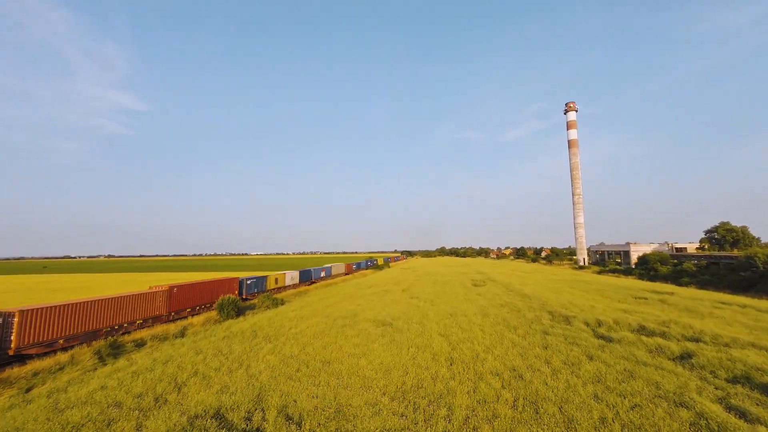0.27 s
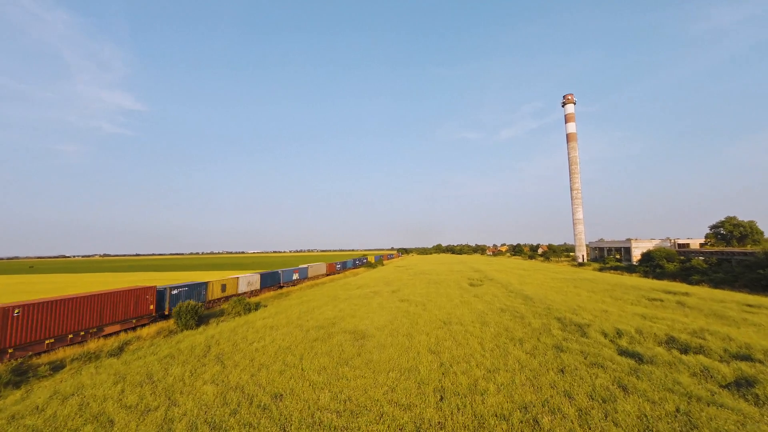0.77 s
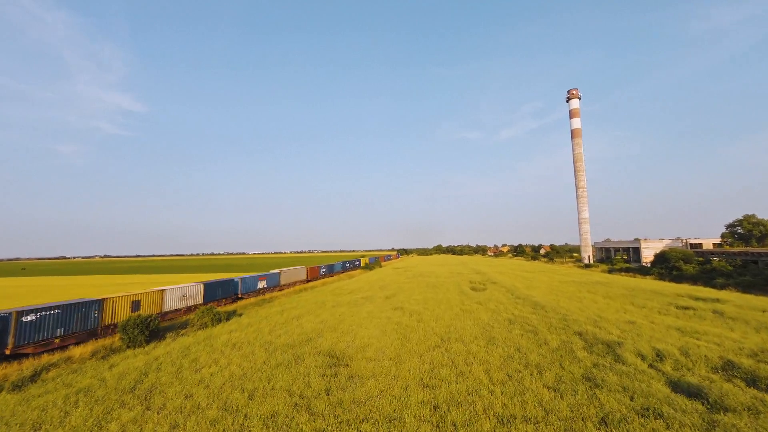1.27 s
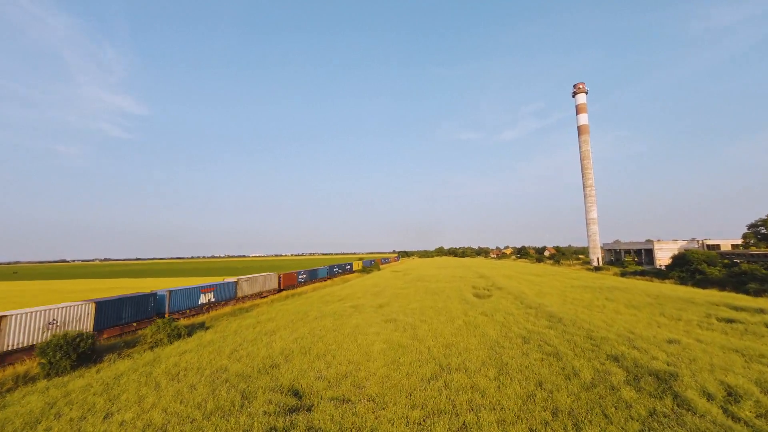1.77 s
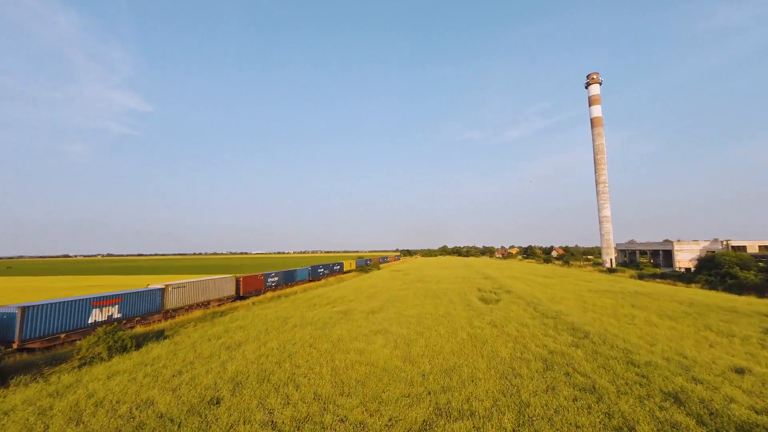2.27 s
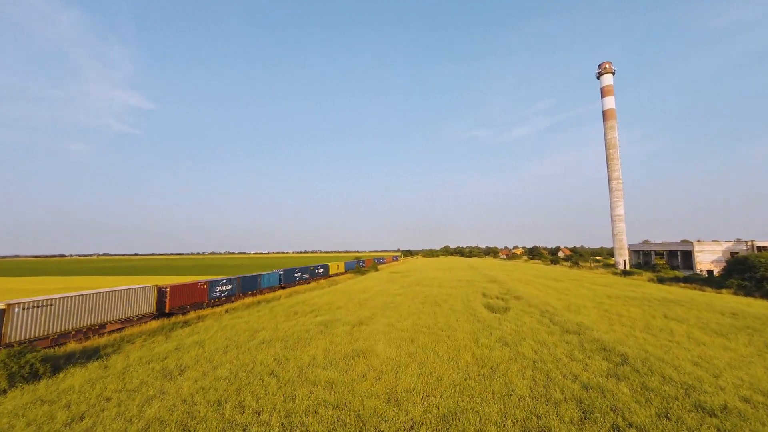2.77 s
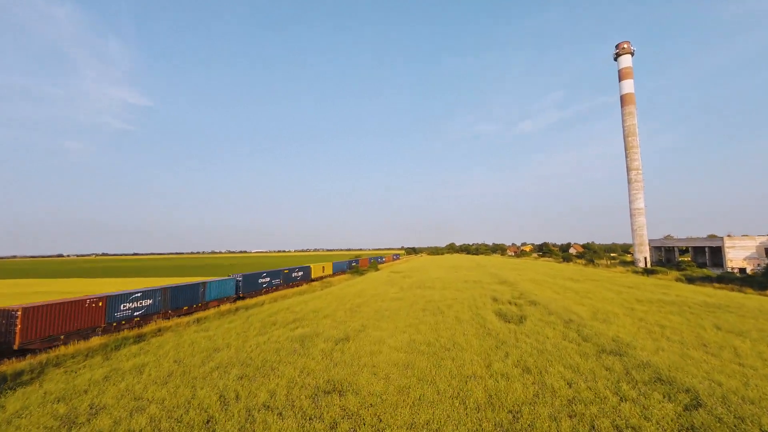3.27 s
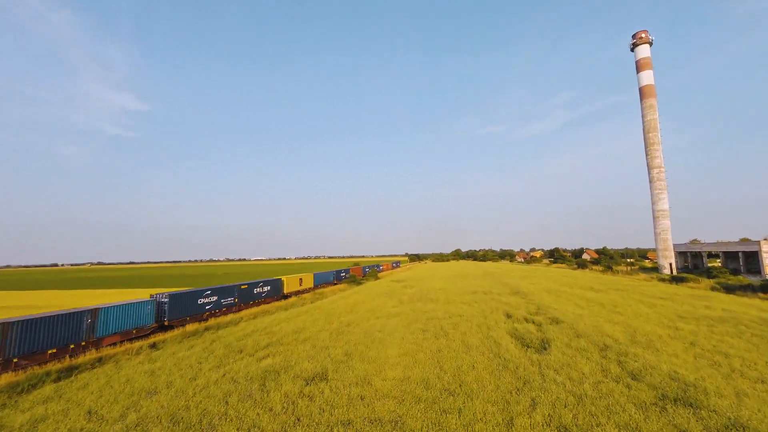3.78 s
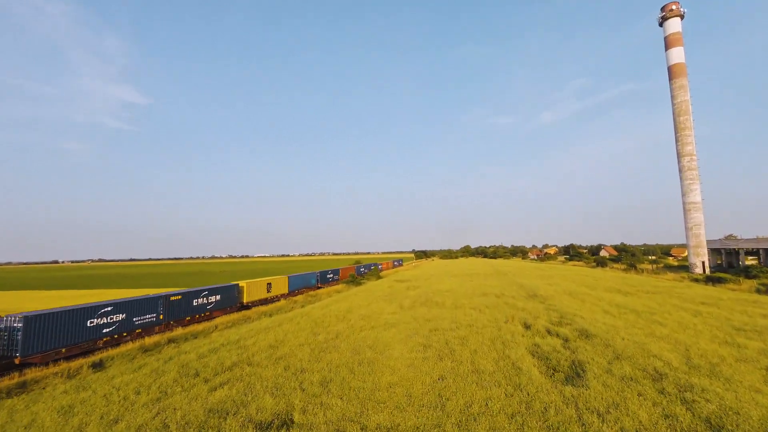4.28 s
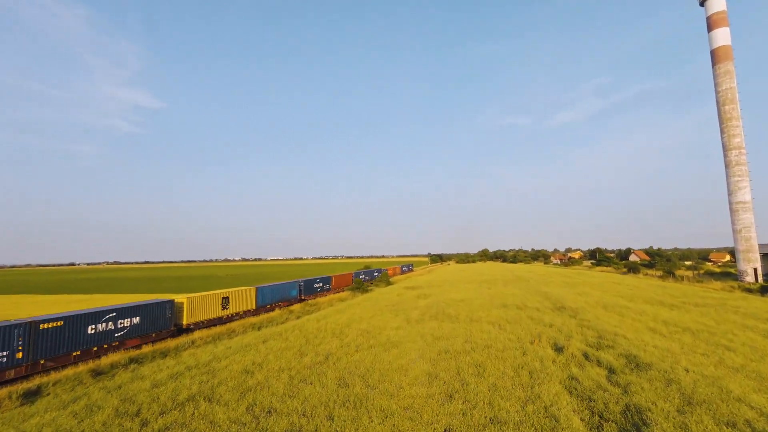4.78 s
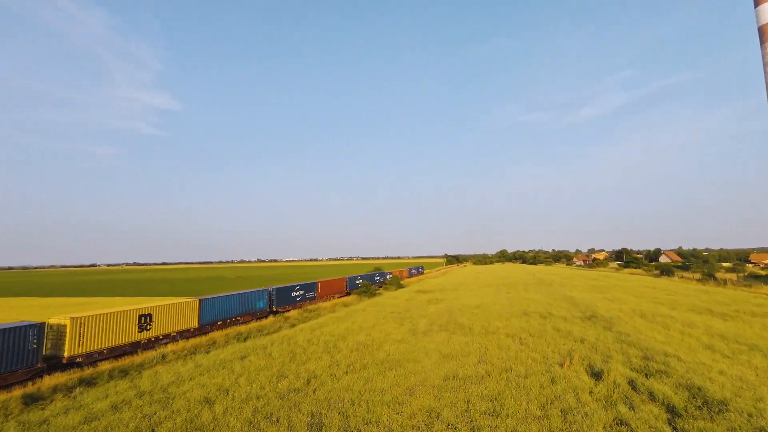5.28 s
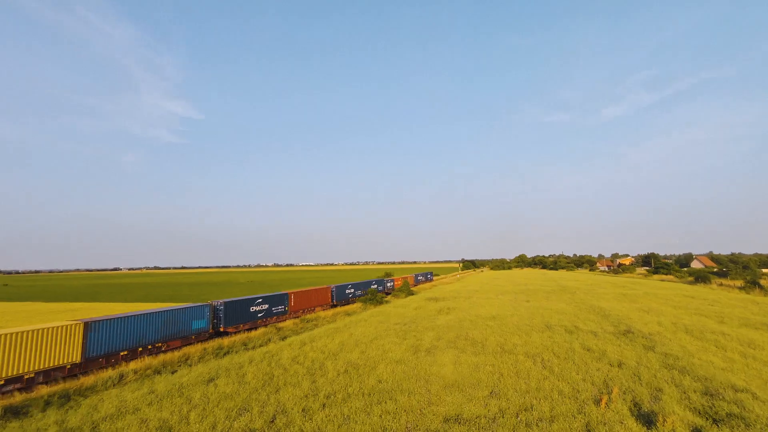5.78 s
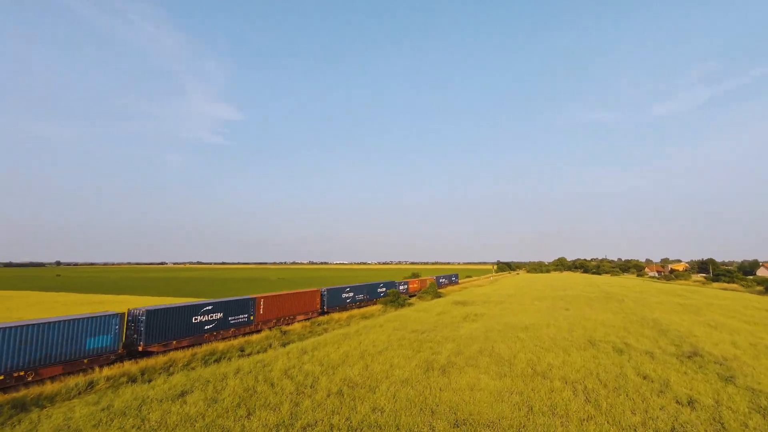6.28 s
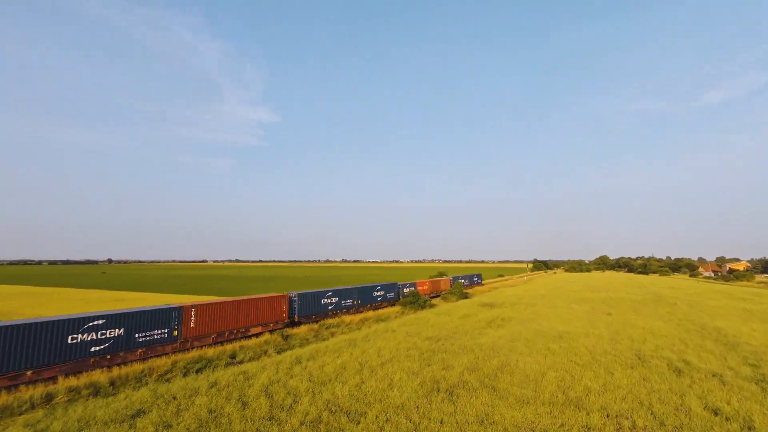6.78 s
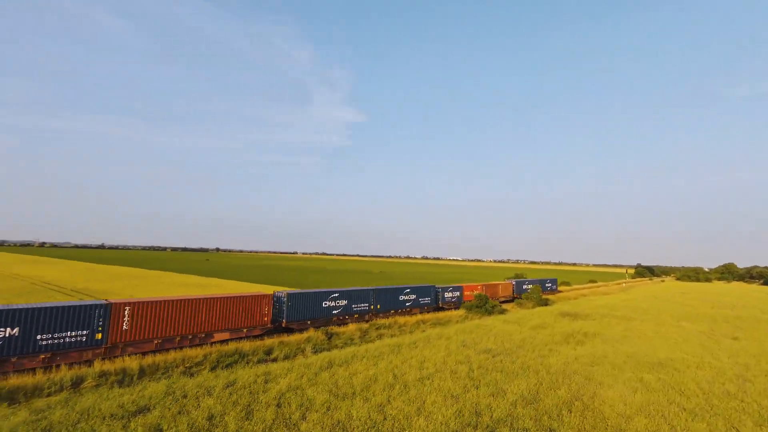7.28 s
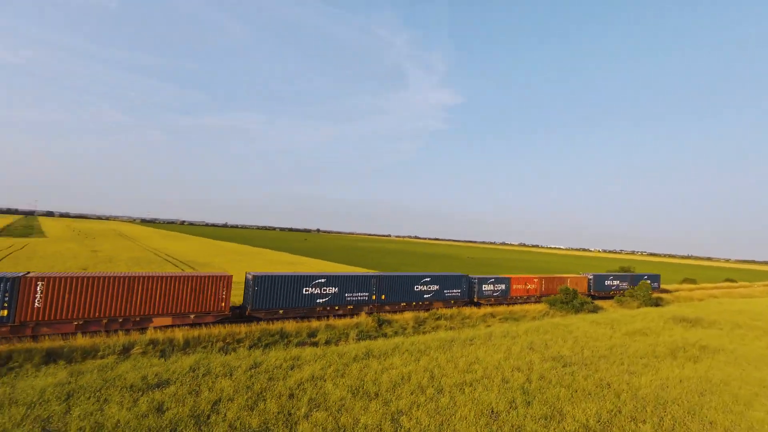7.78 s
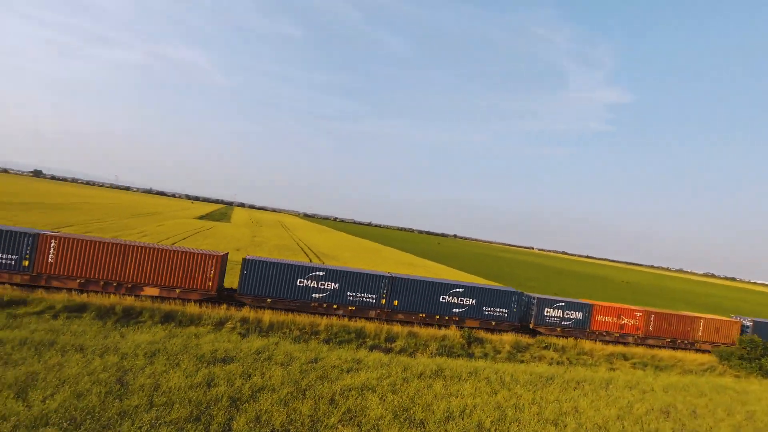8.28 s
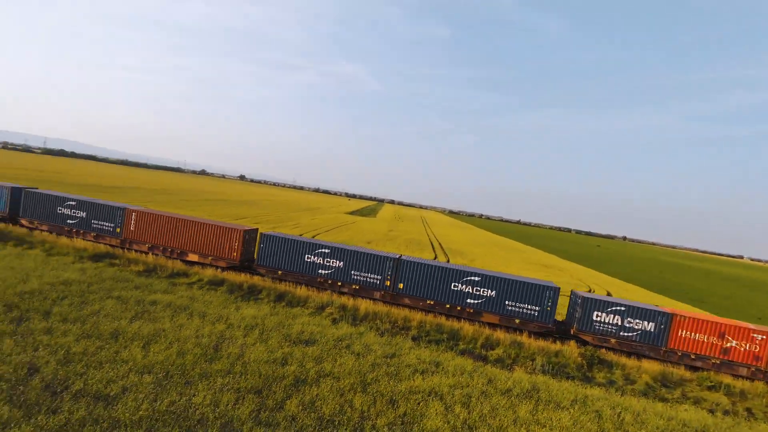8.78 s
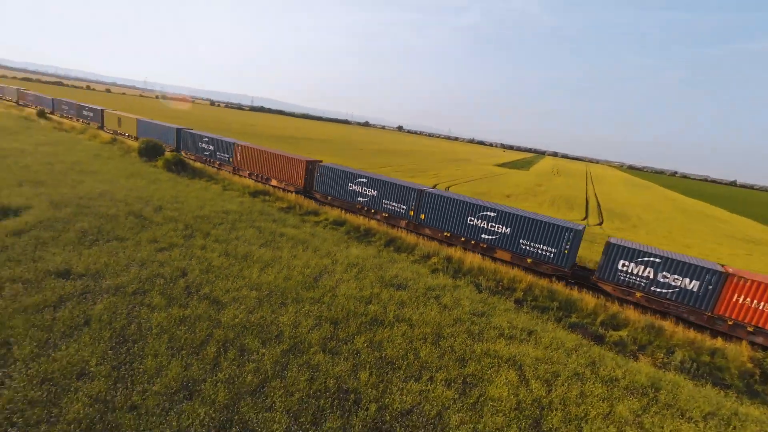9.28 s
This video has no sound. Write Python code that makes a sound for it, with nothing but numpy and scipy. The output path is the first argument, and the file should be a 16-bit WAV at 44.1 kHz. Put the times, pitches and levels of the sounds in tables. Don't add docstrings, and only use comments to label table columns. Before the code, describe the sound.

Continuous loud drone flight over open fields, heard right on the frame: overloaded bassy motor hum with a quick uneven flutter, nasal propeller whine, rattling rumble and breathy blade noise. Small jolts and rough patches break the steadiness. After eight seconds the beat slows and smooths, then the turn brings a stronger whine, a thin high motor tone and a windy gust. Dry, mono, compressed.

```python
import sys
import numpy as np
from scipy import signal
from scipy.fft import rfft, irfft, next_fast_len
from scipy.io import wavfile

SR = 44100
rng = np.random.default_rng(int(sys.argv[2]) if len(sys.argv) > 2 else 0)


def transcribe(signal):
    frames = np.atleast_2d(signal).T
    limited = np.clip(frames, -1, 1)
    pcm = np.round(limited * 32767).astype(np.int16)
    wavfile.write(sys.argv[1], SR, pcm)


def invert_db(x):
    u = np.asarray(x, float) / 20
    return 10 ** u


N = 420273

# time in seconds, level in dB.
WIND_GUSTS = [(0, -28.5), (1.9, -31), (2.4, -33), (3.1, -31), (3.4, -30.5), (4.3, -30.5), (5.5, -32),
              (6, -32), (7, -35.5), (8.3, -33), (8.8, -23.5), (9.53, -26.5)]
# frequency in Hz, level in dB per Hz.
WIND_COLOUR = [(8.8, -40), (15, -12.5), (43, -4.5), (108, -8.5), (125, -5.5), (160, -33.5), (280, -120)]
# frequency in Hz, level in dB per Hz.
RUMBLE_COLOUR = [(100, -32.5), (128, -20), (145, -2), (175, 0), (200, 8.5), (235, -7.5), (275, -26.5),
                 (340, -17), (420, -9.5), (490, -18.5), (600, -10), (690, -18.5), (800, -44)]
# time in seconds, length in seconds, change of the rumble in dB.
SHUDDERS = [
    (1.67, 0.028, -3.5),
    (3.05, .2, 2),
    (4.14, 0.033, 4),
    (4.6, .06, 4.5),
    (7.8, 0.097, 4.5),
    (8.04, 0.032, 4.5),
]
# frequency in Hz, level in dB per Hz.
WASH_COLOUR = [(410, -30), (690, 2.5), (712, -6), (790, -0.5), (1030, -6.5), (1090, -4), (1220, -0.5),
               (1320, -5.5), (1490, -7), (1830, -2.5), (1900, -3), (2010, -10.5), (2400, -38.5),
               (3120, -51), (5280, -120)]
# time in seconds, length in seconds,
# change of the wash in dB.
AIR_BUMPS = [
    (1.85, .07, 4),
    (3.1, 0.3, 1.5),
    (3.506, 0.077, -0.5),
    (6.61, 0.26, 5.5),
    (8.2, 0.036, -16),
    (8.68, 0.039, 3),
]
# frequency in Hz, level in dB per Hz.
CRUISE_HISS_COLOUR = [(1290, -29.5), (2200, -6.5), (2340, -11.5), (2540, -5.5), (3000, -3.5), (3260, 0),
                      (3850, -3.5), (4290, -12), (4690, -9.5), (5940, -4), (6660, -11), (7230, -10),
                      (8050, -18), (9470, -18.5), (11100, -30), (14400, -57.5), (22000, -120)]
# frequency in Hz, level in dB per Hz.
TURN_HISS_COLOUR = [(1180, -35.5), (2000, -10), (2120, -14), (2410, -7.5), (2590, -6.5), (2800, -8),
                    (3180, -6), (3650, -13.5), (4820, -21.5), (5220, -12), (6240, -12.5), (8550, -18),
                    (11100, -35.5), (14400, -60), (22000, -120)]
# time in seconds, share of the turn from 0 to 1.
TURN = [
    (0, 0.06),
    (8.2, 0.07),
    (8.45, 0.5),
    (8.7, 0.8),
    (9.53, 0.87),
]
# frequency in Hz, width in Hz, strength in dB.
FRAME_RESONANCES = [(642.7, 19.6, 5.5), (1112, 20, 11.5), (1224, 49, 0.5), (1850, 32, 4.5)]
# time in seconds, turns a second (Hz) of rotors one, two, three and four.
SHAFT_SPEEDS = [(0.0, 219.3, 205.7, 187.0, 200.2), (0.6, 218.38, 204.62, 186.3, 199.7),
                (1.3, 216.52, 204.38, 189.4, 199.3), (2.0, 217.04, 202.76, 187.6, 198.4),
                (2.7, 217.12, 203.18, 188.6, 198.3), (2.9, 224.33, 209.47, 195.0, 204.4),
                (3.7, 222.47, 208.83, 193.3, 203.5), (4.1, 216.62, 203.38, 191.0, 198.9),
                (5.75, 217.09, 205.41, 189.8, 200.6), (6.2, 219.59, 204.11, 185.8, 199.4),
                (6.8, 222.47, 211.33, 181.2, 206.5), (7.4, 218.56, 208.24, 183.0, 212.8),
                (7.9, 216.4, 211.6, 181.4, 212.0), (8.25, 212.03, 210.37, 187.8, 210.3),
                (8.87, 212.16, 208.64, 196.0, 209.2), (9.08, 214.2, 211.3, 193.8, 212.5),
                (9.25, 221.69, 201.81, 197.5, 211.8), (9.53, 215.27, 204.23, 199.0, 213.0)]
START_ANGLES = [1.72, 6.78, 0, 0]
# time in seconds, load in dB on rotors one, two, three and four.
BLADE_LOAD = [(0, 2.5, 1.5, 1, 4.5), (1, -2.5, 4.5, -1.5, 2), (2.3, -1.5, 7, 2, -0.5), (3.5, 5, 0, -5, 0),
              (4.25, -2, 8, -3, 1), (5.7, -1.5, 2, 0.5, 1), (6.75, 3, 5.5, -4, 1), (7.25, 1, 4, 0.5, 5.5),
              (7.75, 4.5, 7.5, 3, 2), (8.35, 6, -6, 1.5, 6), (8.8, 6.5, 3.5, 3.5, 11),
              (9.2, 6, 9.5, 2.5, 0), (9.53, 6.5, -1.5, 1.5, 2)]
# rotor number from 0, multiple of its shaft speed, level in dB.
ROTOR_TONES = [(0, 1, -7), (0, 2, -31), (0, 3, -30.5), (0, 4, -47), (0, 5, -49.5), (0, 6, -45), (0, 7, -52),
               (0, 15, -54.5), (1, 1, -7), (1, 2, -34), (1, 3, -36), (1, 6, -52), (1, 7, -55),
               (1, 9, -49.5), (1, 12, -61), (2, 1, -24.5), (2, 2, -35), (2, 3, -19), (2, 6, -51),
               (2, 9, -46.5), (2, 10, -52.5), (3, 3, -41.5), (3, 6, -40.5), (3, 15, -56)]


def curves(rows):
    seconds, *columns = np.transpose(rows)
    return [np.interp(np.arange(N) / SR, seconds, column) for column in columns]


def swells(rows):
    time = np.arange(N) / SR
    return sum(db * np.exp(-((time - middle) / length) ** 2) for middle, length, db in rows)


def drift(rate):
    r = np.exp(-80 * np.pi * rate / SR)
    slow = signal.lfilter([1], [1, -2 * r, r * r], rng.standard_normal(N // 40 + 2002))
    slow = slow[2000:]
    return np.interp(np.arange(N) / 40, np.arange(len(slow)), slow / slow.std())


def turbulence(colour, patchy_db, rate, count):
    size = next_fast_len(N)
    octave = np.log2(np.maximum(np.arange(size // 2 + 1) * SR / size, 1))
    hz, db = np.transpose(colour)
    colour_db = np.interp(octave, np.log2(hz), db, -90, -90)
    shaped = rfft(rng.standard_normal(size)) * invert_db(colour_db)
    centres = np.linspace(np.log2(hz[0]), np.log2(hz[-1]), count)
    out = np.zeros(N)
    for share in np.eye(count):
        band = irfft(shaped * np.interp(octave, centres, share), size)[:N]
        out += invert_db(patchy_db * drift(rate)) * band
    return out / out.std()


def wind():
    level_db = curves(WIND_GUSTS)[0] + 3.5 + 2 * drift(4.0)
    return invert_db(level_db) * turbulence(WIND_COLOUR, patchy_db=0.0, rate=3.5, count=2)


def frame_rumble(turn):
    level_db = -12.5 - 0.5 * turn + swells(SHUDDERS) + 1.5 * drift(7.6)
    return invert_db(level_db) * turbulence(RUMBLE_COLOUR, patchy_db=-0.5, rate=5.4, count=4)


def blade_wash(bump_db, flicker):
    level_db = -27.5 + bump_db + 0.6 * flicker
    return invert_db(level_db) * turbulence(WASH_COLOUR, patchy_db=0.46, rate=6.0, count=4)


def tip_hiss(turn, bump_db, flicker, angles):
    level_db = -34 + 3.5 * turn + 0.17 * bump_db + 0.05 * flicker
    passes = 1 + 0.03 * sum(np.cos(3 * angle) for angle in angles)
    cruise = np.sqrt(1 - turn) * turbulence(CRUISE_HISS_COLOUR, patchy_db=-1.17, rate=4.7, count=4)
    banked = np.sqrt(turn) * turbulence(TURN_HISS_COLOUR, patchy_db=-1.0, rate=8.9, count=2)
    return invert_db(level_db) * passes * (cruise + banked)


def air(angles):
    turn = np.clip(curves(TURN)[0], 0, 1)
    bump_db, flicker_rate = swells(AIR_BUMPS), 5.4
    wash = blade_wash(bump_db, drift(flicker_rate))
    hiss = tip_hiss(turn, bump_db, drift(flicker_rate), angles)
    return wind() + frame_rumble(turn) + wash + hiss


def motor(angle):
    level_db = -58 + 25 * curves(TURN)[0]
    return invert_db(level_db) * np.cos(12 * angle)


def frame_ringing(x):
    out = x.copy()
    for hz, width_hz, db in FRAME_RESONANCES:
        r = np.exp(-np.pi * width_hz / SR)
        top = [(1 - r * r) / 2, 0, (r * r - 1) / 2]
        bottom = [1, -2 * r * np.cos(2 * np.pi * hz / SR), r * r]
        out += invert_db(db) * signal.lfilter(top, bottom, x)
    return out


def shaft_angles(speeds):
    hunt_rate, shared_hunt_hz, own_hunt_rad = 5.0, 1.1, 0.08
    shared_hz = shared_hunt_hz * drift(hunt_rate)
    steady = []
    for start, hz in zip(START_ANGLES, speeds):
        steady.append(start + 2 * np.pi * np.cumsum(hz + shared_hz) / SR)
    angles = [angle + own_hunt_rad * drift(hunt_rate) for angle in steady]
    return steady, angles


def rotors():
    load_db, speeds = curves(BLADE_LOAD), curves(SHAFT_SPEEDS)
    steady, angles = shaft_angles(speeds)
    closeness = np.exp(-((speeds[0] - speeds[1]) / 6.3) ** 2)
    shake_db = -1.5 - 4 * closeness
    wobbles_rad = [0.075 * drift(30.0) for _ in angles]
    flutters_db = [1.5 * drift(8.1) for _ in angles]
    shafts, blades = np.zeros(N), np.zeros(N)
    for rotor, multiple, db in ROTOR_TONES:
        k, m = round(rotor), round(multiple)
        if m < 3:
            shafts += invert_db(db + shake_db) * np.cos(m * angles[k])
        else:
            effort_db = load_db[k] * (m / 3) ** 0.25 + flutters_db[k] * np.sqrt(m / 3)
            blades += invert_db(db + effort_db) * np.cos(m * (angles[k] + wobbles_rad[k]))
    tones = np.sqrt(2) * (shafts + frame_ringing(blades) + motor(steady[0]))
    return tones, angles


def scene():
    tones, angles = rotors()
    return (tones + air(angles))[None]


def limiter_cut(x):
    limit_db, release_db_per_s, attack_s = -2.5, 55, 0.0014
    fall = release_db_per_s * np.arange(N) / SR
    level_db = np.r_[0, 20 * np.log10(abs(x[0, 1:]) + 1e-6)]
    held_db = np.maximum.accumulate(level_db + fall) - fall
    want_db = np.minimum(limit_db - held_db, 0)
    r = np.exp(-1 / (attack_s * SR))
    return signal.lfilter([1 - r], [1, -r], want_db - want_db[0]) + want_db[0]


def band_limit(x):
    return signal.sosfilt(signal.butter(12, 15010, fs=SR, output="sos"), x)


def record(dry):
    x = 1.72 * np.tanh(dry / 2.69)
    cut_db = limiter_cut(x)
    self_noise = invert_db(-65.5) * signal.lfilter([0.5, 0.5], [1], rng.standard_normal(N))
    x = x + self_noise
    x = x * invert_db(cut_db)
    split = signal.butter(1, 1900, fs=SR, output="sos")
    lows = signal.sosfilt(split, x)
    highs = (x - lows) * invert_db(0.43 * cut_db)
    mix = 1.129 * np.tanh(1.2 * lows / 1.027) + 1.107 * highs
    return band_limit(mix)


dry = scene()
out = record(dry)
transcribe(out)
```